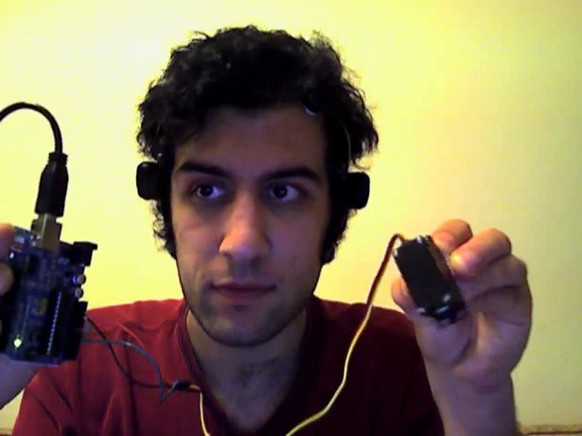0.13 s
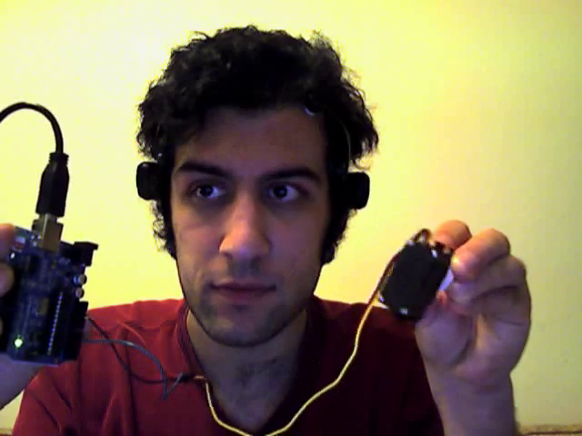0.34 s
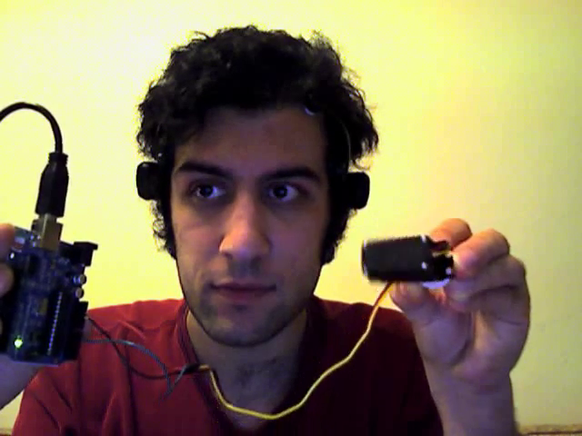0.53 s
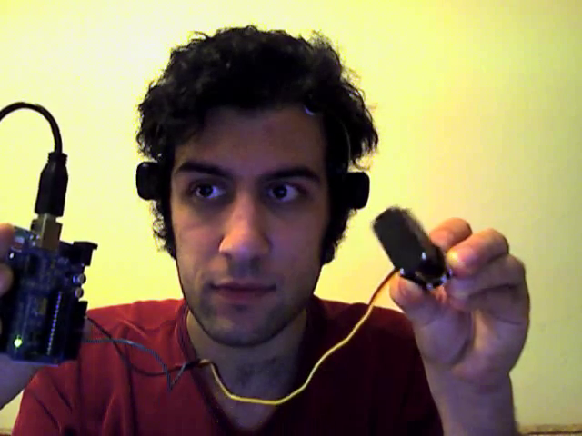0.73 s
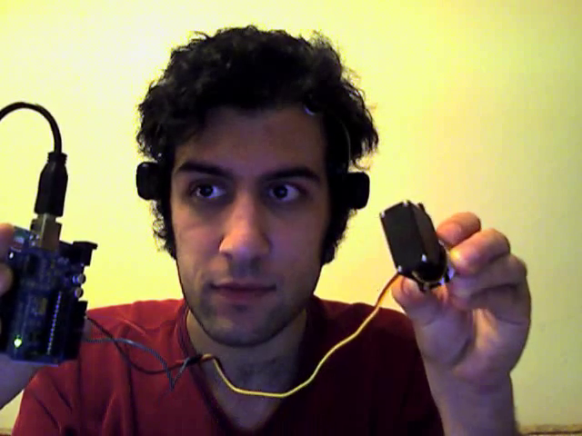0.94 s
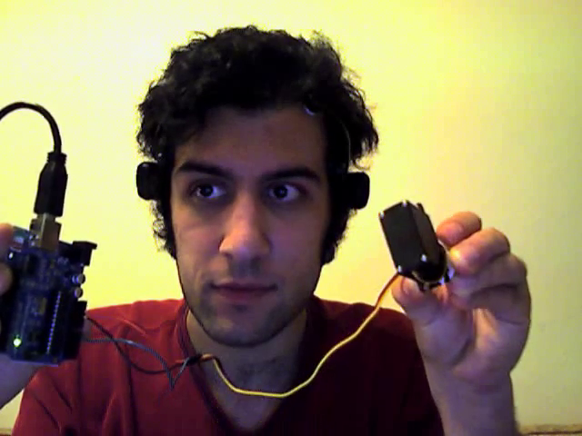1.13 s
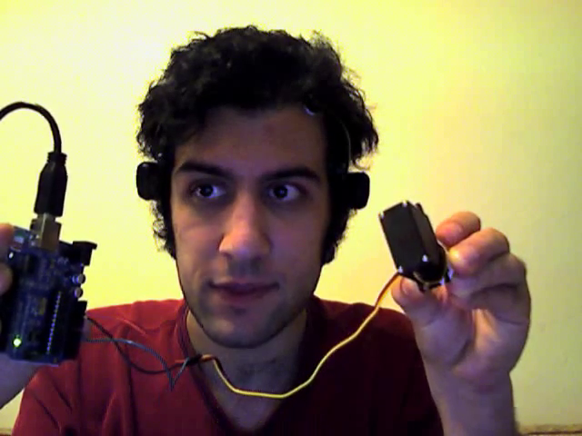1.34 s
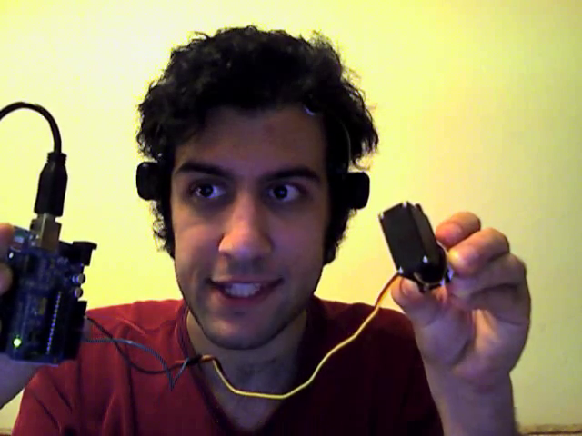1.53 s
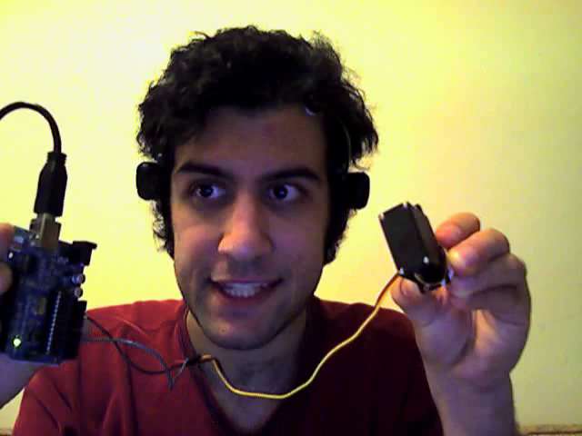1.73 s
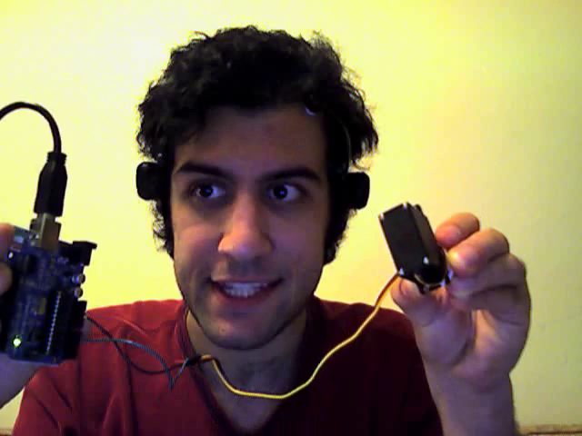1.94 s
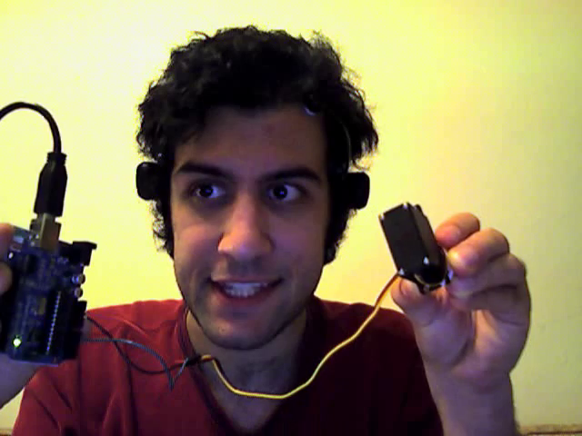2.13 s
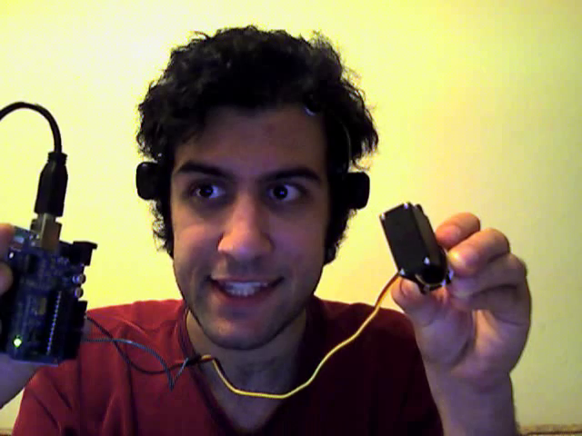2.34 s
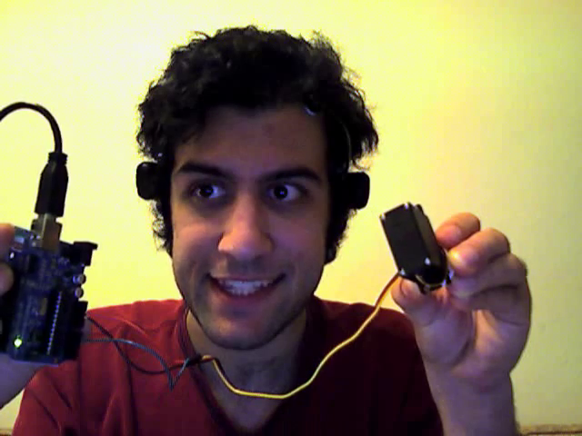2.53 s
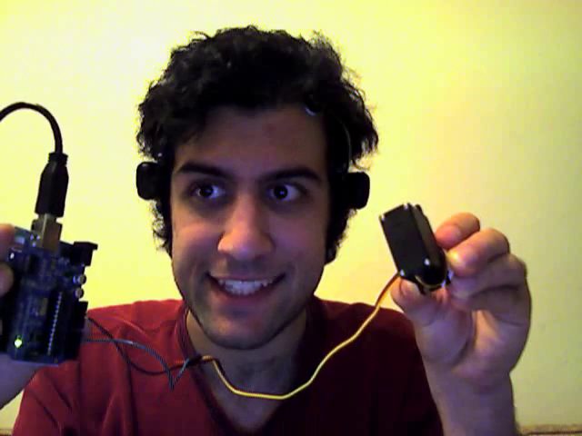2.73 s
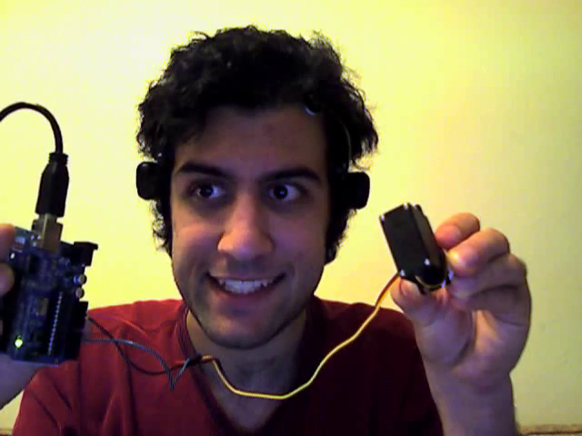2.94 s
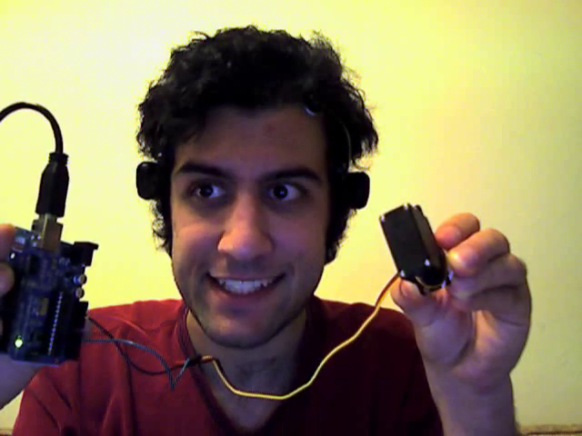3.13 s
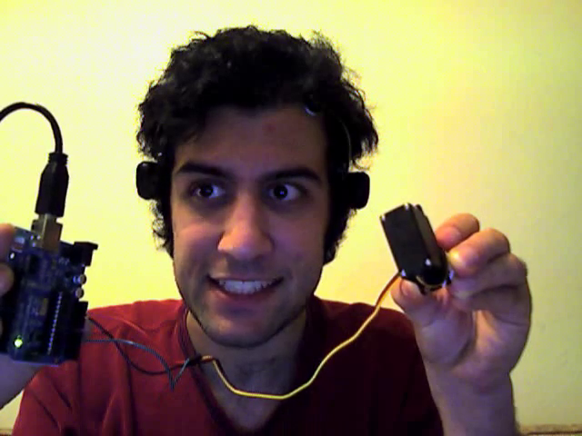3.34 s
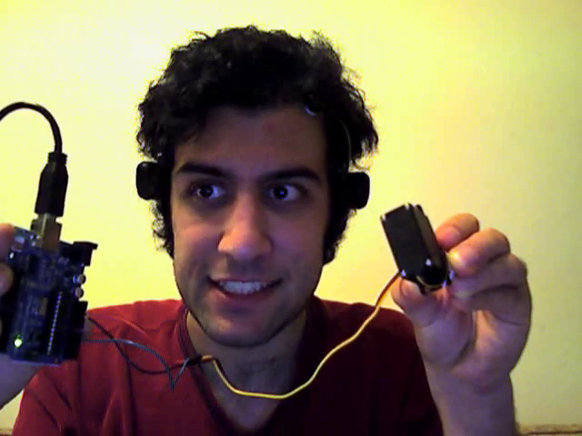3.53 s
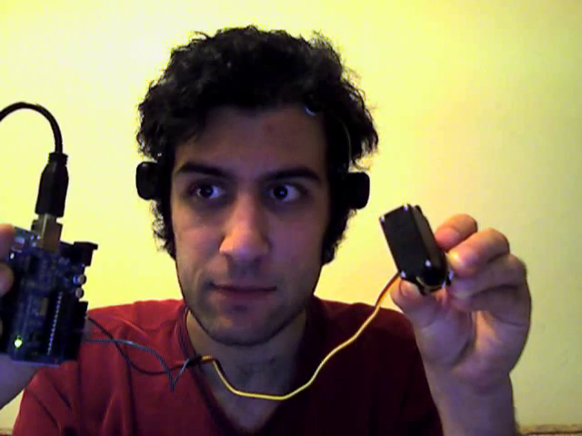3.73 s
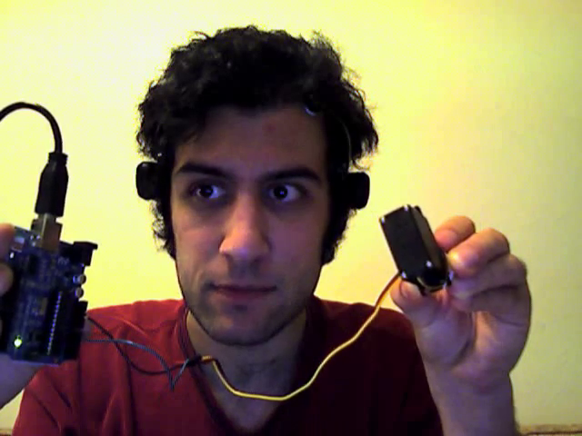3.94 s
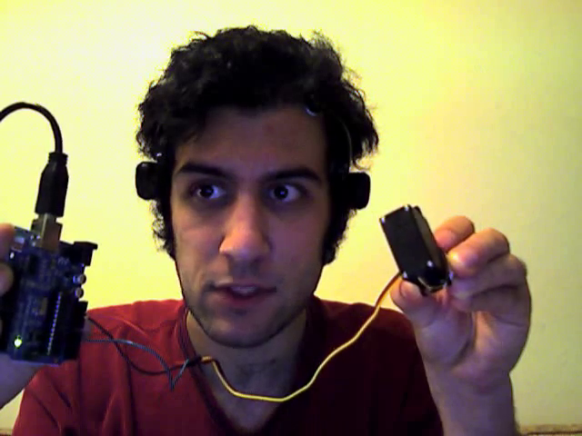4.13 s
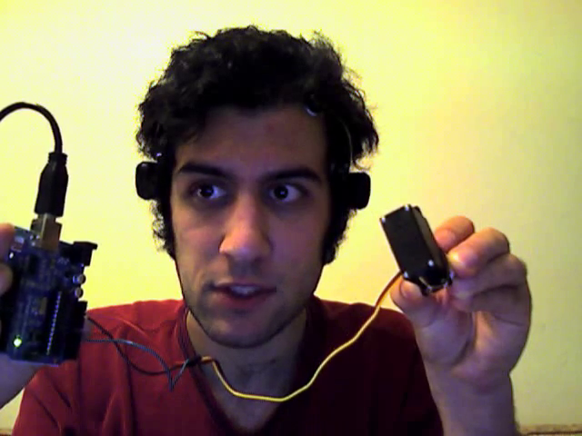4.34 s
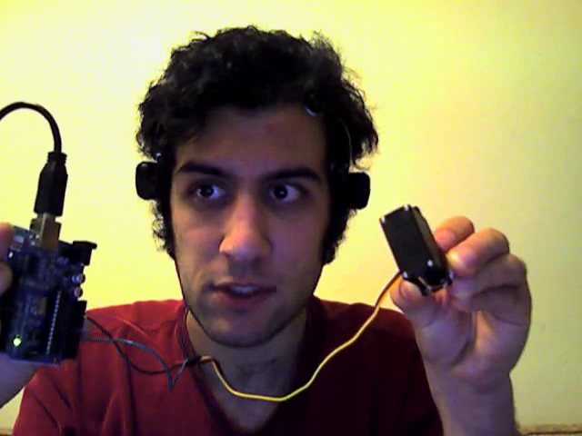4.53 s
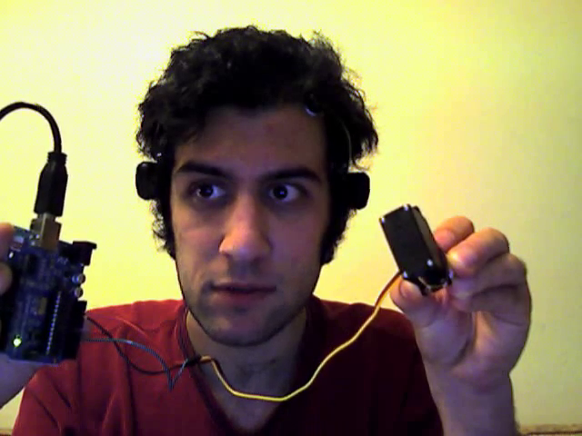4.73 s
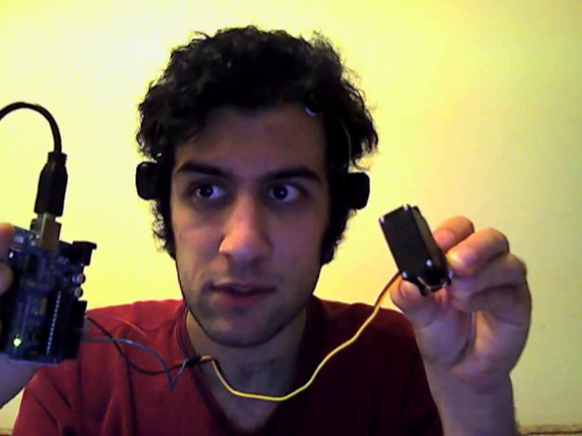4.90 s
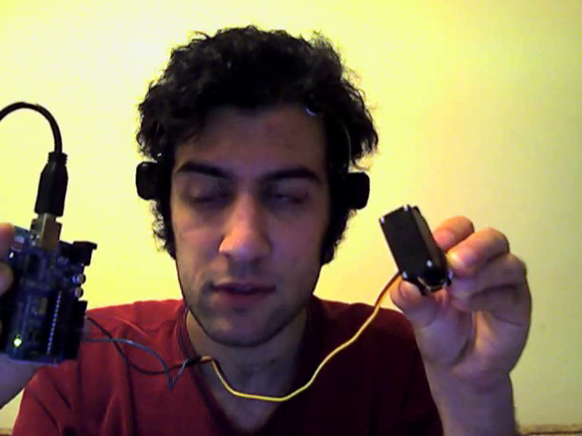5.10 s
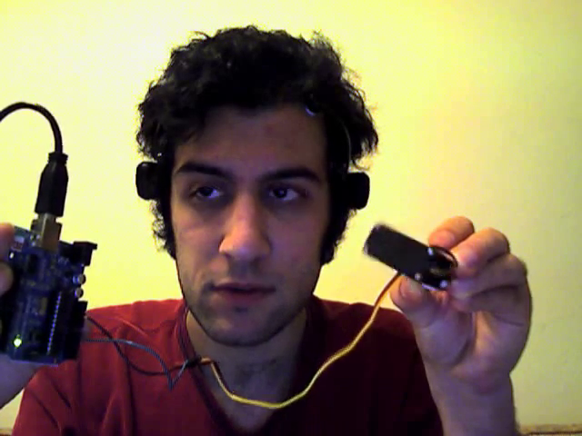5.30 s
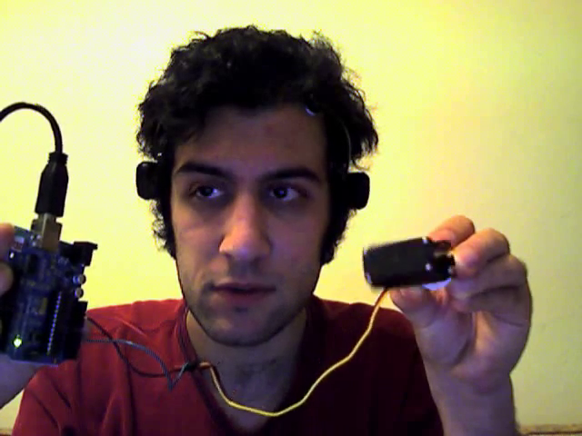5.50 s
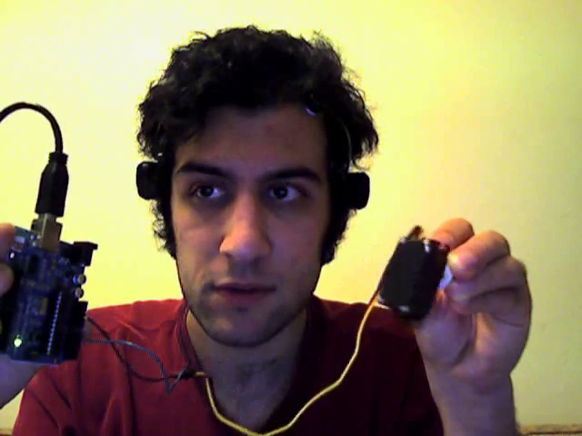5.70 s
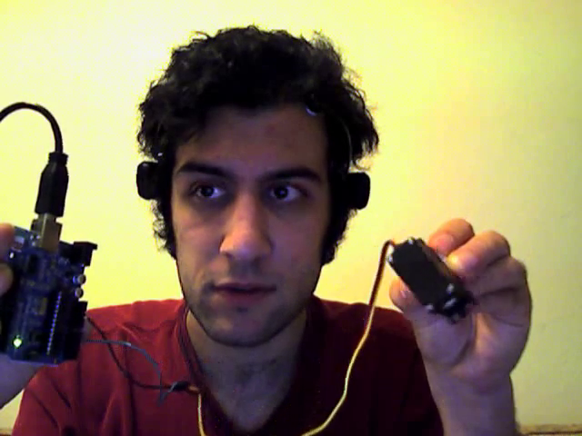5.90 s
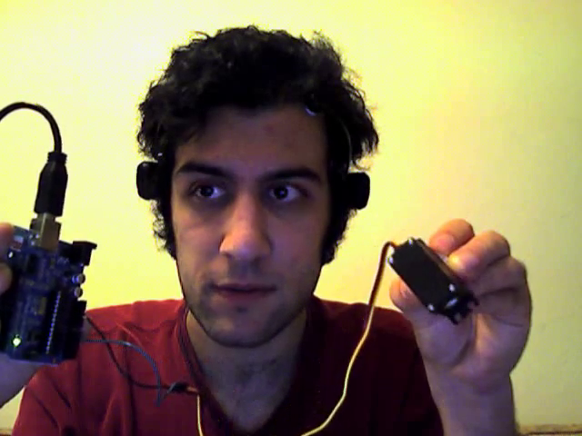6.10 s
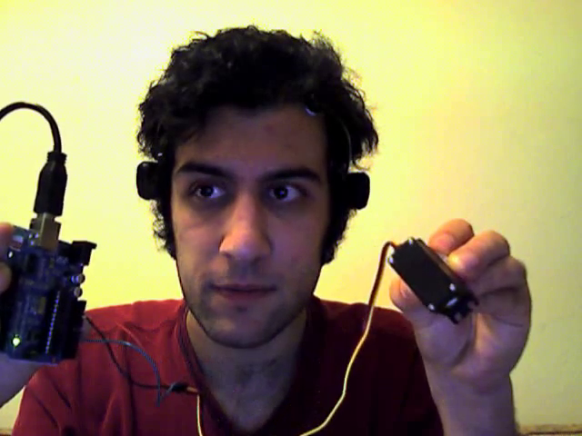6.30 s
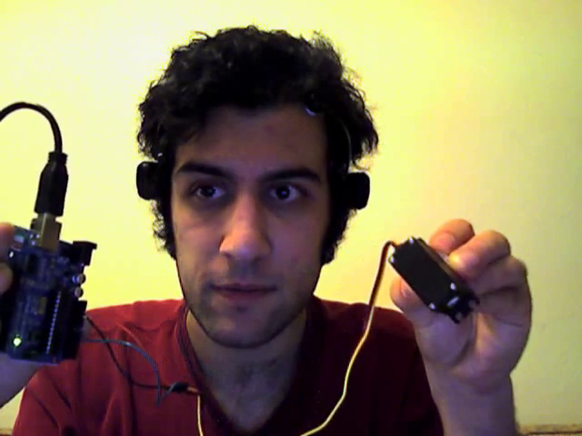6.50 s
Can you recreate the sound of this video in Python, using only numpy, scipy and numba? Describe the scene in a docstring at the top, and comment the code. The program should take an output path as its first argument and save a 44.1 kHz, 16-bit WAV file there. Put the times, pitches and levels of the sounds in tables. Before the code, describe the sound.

A quiet small room with soft hiss, faint low hum and unevenly swelling rumble. At 0.2 s a tiny geared motor close to the microphone starts abruptly with light clicks and whirs: a bright, gritty, buzzing chatter, strongest around 4 to 7 kHz, with thin whining tones that shift as the plastic case turns. At about 0.94 s it brakes with a tight cluster of hard knocks and is silent by 1.0 s, leaving a short damped echo. A crisp tick cluster falls at 1.65 s, a very faint one at 2.4 s, small clicks at 3.8 and 4.2 s, and a faint one at 5.0 s, among barely audible rustles. At 5.35 s the motor whirs again, similarly rough and reedy, with slight knocks near 5.6 s. It stops around 6.05 to 6.12 s with louder clacks and a brief rattle, then the hushed room remains until about 6.7 s.

```python
"""Small geared servo swinging

A small geared servo, held by its arm, swings its plastic case one way and later back, close to the microphone.
Random tooth impacts ring moving case resonances, noise bands make the tooth whine, narrow wall modes sing.
Chirped slack knocks come mostly at start and stop; short ringing ticks fall between the swings.
Underneath: a damped room of decaying noise, banded hiss and rumble, wavering hum and soft noise rustles."""
import sys
import numpy as np
from scipy import signal
from scipy.io import wavfile
from scipy.ndimage import uniform_filter1d
from numba import njit

SR = 44100
rng = np.random.default_rng(int(sys.argv[2]) if len(sys.argv) > 2 else 0)


def materialize(psi):
    """Save the field psi as 16-bit PCM at rate SR to the path in sys.argv[1].

    A 1-D psi becomes a single channel; in a 2-D psi each row is a channel.
    """
    bounded = np.clip(np.atleast_2d(psi).T, -1, 1)
    quanta = np.round(bounded * 32767).astype(np.int16)
    wavfile.write(sys.argv[1], SR, quanta)


N = 293558


def undb(db):
    """dB to gain."""
    return 10 ** (np.asarray(db) / 20)


def unit(x):
    """Scale to rms 1."""
    return x / np.sqrt(np.mean(x ** 2))


def tone(hz):
    """A sine that follows a moving pitch."""
    return np.sin(2 * np.pi * np.cumsum(hz) / SR)


def decay(t, t60_s):
    """Exponential fall of 60 dB in t60_s."""
    return np.exp(-np.log(1000) * t / t60_s)


def walk(rate_hz, size=N):
    """Random levels held for 1 / rate_hz and smoothed twice; spread near 1."""
    hold = int(SR / rate_hz)
    steps = np.repeat(rng.standard_normal(size // hold + 1), hold)
    return 1.3 * uniform_filter1d(uniform_filter1d(steps, hold), hold)[:size]


def ring(x, hz, width_hz):
    """One fixed resonance."""
    return signal.lfilter(*signal.iirpeak(min(hz, .45 * SR), hz / width_hz, fs=SR), x)


def noise_band(size, hz, width_hz):
    """Noise through the same resonance twice, rms 1."""
    return unit(ring(ring(rng.standard_normal(size), hz, width_hz), hz, width_hz))


@njit
def glide(x, hz, width_hz):
    """A steep resonance (two state-variable bandpasses in a row) whose centre moves."""
    y = x.copy()
    for _ in range(2):
        band, low = 0., 0.  # integrator states
        for i in range(len(x)):
            g, damping = np.tan(np.pi * hz[i] / SR), width_hz / hz[i]
            v = (band + g * (y[i] - low)) / (1 + g * (g + damping))
            band, low, y[i] = 2 * v - band, low + 2 * g * v, damping * v
    return y


def waver(hz, width_hz):
    """A thin band of noise about a moving pitch, rms 1."""
    pole = np.exp(-np.pi * width_hz / SR)
    slow = signal.lfilter([1], [1, -pole], rng.standard_normal((2, len(hz))))
    carrier = np.exp(2j * np.pi * np.cumsum(hz) / SR)
    return unit(((slow[0] + 1j * slow[1]) * carrier).real)


# breakpoints of the low rumble: t/s, level/dB (heard as swells about the mean below)
RUMBLE = [(0.0, -45), (0.09, -59), (0.65, -59.5), (0.78, -46), (1.11, -63.5), (1.18, -49), (1.3, -66),
          (1.39, -57), (2.35, -60.5), (2.39, -49), (2.65, -61.5), (2.89, -52), (2.95, -63), (3.15, -51),
          (3.21, -57), (3.63, -62), (3.67, -46.5), (3.74, -58), (4.51, -55.5), (4.56, -48), (4.65, -66),
          (4.99, -49.5), (5.04, -58), (6.17, -56.5), (6.34, -59.5), (6.66, -61)]
RUMBLE_MEAN_DB, RUMBLE_FLUTTER_DB = -58.5, 1.5


def rumble_swell(t):
    """Rumble swells in dB about the mean, with a random flutter several times a second."""
    return np.interp(t, *np.transpose(RUMBLE)) - RUMBLE_MEAN_DB + RUMBLE_FLUTTER_DB * walk(9)


# spectrum of the hiss and bass, relative: f/Hz, density/dB per Hz
HISS_SPECTRUM = [(15, -29), (25, -2), (50, -4.5), (91, -10), (150, -12.5), (300, -15.5), (450, -15),
                 (900, -16.5), (1330, -21), (1900, -20), (2500, -22.5), (3570, -30.5), (4300, -20),
                 (5200, -27.5), (8560, -36.5), (13000, -49.5), (15000, -72.5)]
HISS_DB, RUMBLE_EDGE_HZ = -54.5, 198  # overall rms; above the edge the swells fade out


def hiss(swell_db):
    """Quarter-octave noise bands in drifting patches; the bass follows the rumble swells."""
    out, (hz_at, db_at) = 0, np.transpose(HISS_SPECTRUM)
    for hz in 25 * 2 ** np.arange(0, 9.3, 1 / 4):
        band_db = np.interp(np.log(hz), np.log(hz_at), db_at) + 10 * np.log10(hz)  # wider bands hold more
        bass_db = swell_db / (1 + (hz / RUMBLE_EDGE_HZ) ** 2)
        patch_db = 3 * walk(11) / (1 + hz / 6000)  # steadier toward the treble
        out = out + noise_band(N, hz, hz / 4) * undb(band_db + bass_db + patch_db)
    return unit(out) * undb(HISS_DB)


# hum tones, before swell and waver: f/Hz, rms level/dB
HUM = [(120, -66), (278, -74.5)]


def hum(swell_db):
    """Low sines that waver in pitch and level and swell along with the rumble."""
    out = 0
    for hz, db in HUM:
        level_db = db + 1.01 * swell_db + 0.525 * walk(2.2)
        out = out + np.sqrt(2) * undb(level_db) * tone(hz + 2.48 * walk(9.5))
    return out


# brief soft rustles: t/s, level/dB, f/Hz, width/Hz, length/s
RUSTLES = [(1.27, -57, 584, 600, 0.032), (1.713, -57, 507, 500, 0.022), (2.171, -65.5, 2490, 248, 0.021),
           (3.122, -62.5, 580, 596, 0.063), (3.542, -55, 780, 814, 0.028), (3.901, -60.5, 580, 596, 0.067),
           (3.969, -61.5, 1720, 250, 0.028), (4.21, -62, 5040, 900, 0.04), (4.266, -63, 2010, 350, 0.044),
           (5.325, -64, 2480, 120, 0.04)]


def rustles(t):
    """Short puffs of wide or narrow noise under bell-shaped swells."""
    out = np.zeros(N)
    for at, db, hz, width_hz, length in RUSTLES:
        near = slice(int(at * SR) - SR // 4, int(at * SR) + SR // 4)
        puff = np.exp(-((t[near] - at) / length) ** 2)
        out[near] += undb(db) * noise_band(SR // 2, hz, width_hz) * puff
    return out


ROOM_T60_S, ROOM_DB, ROOM_GAP_S, ROOM_TOP_HZ = 0.33, -11, 0.012, 12000
EARLY_T60_S, EARLY_DB = 0.098, 5  # the first echoes stand above the tail and die quickly


def room(x):
    """Diffuse echo of decaying noise: weak from nearby things, fuller when the walls answer, dull on top."""
    t = np.arange(SR // 2) / SR
    fall = decay(t, ROOM_T60_S) + undb(EARLY_DB) * decay(t, EARLY_T60_S)
    arrival = np.where(t < ROOM_GAP_S, .5, 1) * (t > .001)
    tail = rng.standard_normal(len(t)) * fall * arrival
    tail = signal.lfilter(*signal.butter(1, ROOM_TOP_HZ, fs=SR), tail)
    return undb(ROOM_DB) * signal.fftconvolve(x, tail / np.linalg.norm(tail))[:N]


# dry ticks: t/s, level/dB (before tilt and mode levels), tilt/dB per octave, thud level/dB,
# level toward the walls/dB (relative to direct)
TICKS = [(1.647, -25, 17.5, -72, -4), (1.6483, -30, 8, -70, -3), (1.6488, -17, -3, -68, -5.5),
         (1.6498, -21.5, 1.5, -70, -1.5), (2.375, -52, 18, -85, -2), (3.8113, -38, -6, -60, 2),
         (3.8121, -29.5, -1, -39.5, -1), (4.1751, -43.5, 0, -48, 8), (4.184, -50, 0, -79, -1),
         (4.2, -55, 0, -80, 3), (4.218, -48, -8, -77, 3), (4.229, -60, 0, -80, 3),
         (4.245, -50, -13, -79, 0), (4.9938, -44.5, -24, -84, 4), (4.9942, -56, -10, -76, 7)]
# short modes shared by all ticks: f/Hz, level/dB, t60/s
TICK_MODES = [(2800, -19, .004), (3950, -7, .004), (5100, 0, .0042), (6300, -5, .0032), (7550, -9, .003),
              (8800, -16, .0025), (10300, -27, .002), (13500, -43, .001)]
TICK_PIVOT_HZ, THUD_HZ, THUD_S = 5500, 1370, 0.00074
TICK_CONTACT_S = 0.0004  # the blow builds up over this time


def ticks(t):
    """Each tick rings the same short modes, brighter or duller, over a soft thud. Rows: direct, toward the walls."""
    out = np.zeros((2, N))
    for at, db, tilt_db, thud_db, walls_db in TICKS:
        near = slice(int(at * SR) + 1, int(at * SR) + SR // 20)
        age = t[near] - at
        thud_shape = age / THUD_S * np.exp(1 - age / THUD_S)
        tick = undb(thud_db) * np.sin(2 * np.pi * THUD_HZ * age) * thud_shape
        for hz, mode_db, t60_s in TICK_MODES:
            level_db = db + mode_db + tilt_db * np.log2(hz / TICK_PIVOT_HZ)
            shape = (1 - np.exp(-age / TICK_CONTACT_S)) ** 3 * decay(age, t60_s)
            tick += undb(level_db) * np.sin(2 * np.pi * hz * age) * shape / shape.max()
        out[:, near] += np.outer([1, undb(walls_db)], tick)
    return out


# gear slack taken up: t/s, peak level/dB, f/Hz (at the peak), length/s
KNOCKS = [(.209, -25, 6000, .001), (0.217, -20.5, 6200, 0.0019), (0.222, -17.5, 6510, 0.0022),
          (0.933, -16, 5800, 0.0016), (.938, -12.5, 6700, 0.002), (0.9394, -11, 4880, 0.0022),
          (0.9445, -14.5, 4970, 0.0016), (0.953, -29, 5000, 0.00073), (5.355, -22, 5140, 0.0041),
          (5.361, -34, 2800, 0.0016), (5.362, -20, 5000, 0.0027), (5.597, -28, 6550, 0.003),
          (5.604, -26, 6500, 0.003), (6.043, -19, 6500, .003), (6.046, -13, 6170, .0013),
          (6.0485, -7.5, 5700, .0024), (6.053, -12.5, 6100, 0.00092), (6.056, -18.5, 6350, 0.0015),
          (6.0586, -15, 6200, .001), (6.0608, -19, 5900, .001), (6.064, -25, 6340, .0015),
          (6.0886, -17, 6450, .0009), (6.0904, -17, 6450, .0009), (6.0923, -17.5, 6250, 0.0009)]
KNOCK_FALL_HZ_PER_S = 104000  # each knock's ring falls quickly in pitch, which broadens it
KNOCK_RISE_SHARE = 0.68  # rise time as a share of the length
RATTLE_DB, RATTLE_PER_DB = 14.5, 0.67  # the chatter flares with each knock, more with a hard one


def knocks(t):
    """Slack knocks as falling chirps under short blows; returns the chatter's flare gain and the rings."""
    rattle, rings = np.ones(len(t)), np.zeros(len(t))
    for at, db, hz, length in KNOCKS:
        age = t - at
        blow = np.exp(-np.maximum(-age / KNOCK_RISE_SHARE, age) ** 2 / length ** 2)
        cycles = (hz - KNOCK_FALL_HZ_PER_S / 2 * age) * age
        rattle += undb(RATTLE_DB + RATTLE_PER_DB * db) * blow
        rings += undb(db) * blow * np.sin(2 * np.pi * cycles)
    return rattle, rings


# swings: motor on t/s, braking t/s, at rest t/s, from/degrees, to/degrees, tooth rate f/Hz,
# body level/dB, edge level/dB, top level/dB
SWINGS = [(0.2075, 0.936, 0.995, 0.55, 185, 2021, 4, 2, -1),
          (5.348, 6.053, 6.125, 169, 8.2, 2106, 1.5, -3.5, 2.5)]
START_SAG, RUN_UP_S = .055, .13  # wall modes start flat by this share and rise as the motor gains speed


def motion(t):
    """How the servo moves: gates for running and driven, case angle, tooth rate, face levels and start sag."""
    running, driven, angle, tooth_hz, face_db, sag = 0, 0, 0, 0, 0, 0
    for on, brake, rest, start_deg, end_deg, hz, *db in SWINGS:
        now = (t > on) & (t < rest)
        running = running + np.clip((t - on) / 0.0052, 0, 1) * np.clip((rest - t) / 0.0096, 0, 1)
        driven = driven + now * np.clip((brake - t) / 0.0048, 0, 1)
        angle = angle + now * np.interp(t, [on, brake], [start_deg, end_deg])
        tooth_hz = tooth_hz + now * hz
        face_db = face_db + np.outer(db, now)
        sag = sag + now * START_SAG * np.exp(-np.abs(t - on) / RUN_UP_S)
    return running, driven, angle, tooth_hz, face_db, sag


# shafts that make the chatter throb: f/Hz, depth/0-1
SHAFTS = [(64, .2), (35, .18), (200, .08)]


def chatter(n, hits_hz=9000):
    """Dense uneven tooth impacts that throb with the shafts, rms 1."""
    hits = (rng.random(n) < hits_hz / SR) * rng.standard_normal(n)
    for hz, depth in SHAFTS:
        hits = hits * (1 + depth * tone(hz * (1 + 0.05 * walk(8.5, n))))
    return unit(hits)


MODE_WANDER, MODE_DRIFT_DB = .007, 1.5  # pitch wander as a share; level drift


def face(hits, modes, rattle, centre_hz):
    """The modes of one face, rms near 1 between knocks; each swells, fades and wanders in pitch at random."""
    out, n = 0, len(hits)
    for k, (hz, width_hz, db) in enumerate(modes):
        level = undb(db + MODE_DRIFT_DB * walk(30, n)) / np.sqrt(width_hz)
        mode_hz = (centre_hz + hz) * (1 + MODE_WANDER * walk(20, n))
        # two stages in a row narrow the peak, so each is widened
        out = out + (-1) ** k * level * glide(hits, mode_hz, 1.33 * width_hz)
    return unit(out) * np.sqrt(np.mean(rattle ** 2))


# case modes by face: f/Hz, width/Hz, level/dB (relative within a face)
BODY = [(2930, 500, 5), (3450, 500, 4), (4100, 450, 17), (4500, 450, 17)]
EDGE = [(7210, 450, 4.5), (8430, 760, -7), (9160, 370, -6.5), (9880, 1100, -6.5)]
TOP = [(11300, 2200, 8), (12900, 1200, 0), (14070, 900, -1.5)]
# the two rings of modes: f/Hz from the sliding centre, width/Hz, level/dB
LOWER_RING = [(-400, 430, -5.5), (-80.5, 510, -2.5), (251.5, 480, -0.5), (579.5, 480, -5.5)]
UPPER_RING = [(-350, 490, -1.4), (-2, 350, -1.6), (230.5, 290, -1.5)]
# ring centres sliding as the case turns, one list a swing: t/s, lower f/Hz, upper f/Hz
RING_CENTRES = [
    [(.23, 5170, 6540), (.45, 5350, 6490), (.66, 5090, 6540), (.82, 4976, 6166), (.93, 5063, 6150)],
    [(5.38, 5080, 6235), (5.5, 5320, 6470), (5.6, 5380, 6550), (5.75, 5350, 6494), (5.86, 5410, 6330),
     (6.04, 5460, 6365)],
]
# case angles at which the face levels are given: angle/degrees
ANGLES_DEG = [0, 30, 60, 90, 120, 150, 180]
# face levels above the lower ring, one at each angle, before the swing's own trim: level/dB
UPPER_DB = [-2.5, 1, 2, 4, 0.5, -1, 1.5]
BODY_DB = [-13.5, -19.5, -16.5, -19.5, -14.5, -16.5, -14]
EDGE_DB = [-11.5, -14.5, -14, -13.5, -11, -8, -17.5]
TOP_DB = [-37, -31, -31.5, -25, -26.5, -23, -39]


def case(t, hits, rattle, angle, face_db):
    """Tooth impacts ring every face of the plastic case; the balance shifts as the case turns."""
    def facing(db):
        return np.interp(angle, ANGLES_DEG, db)

    at, lower_at, upper_at = np.vstack(RING_CENTRES).T
    body_db, edge_db, top_db = face_db
    faces = ((LOWER_RING, 0, np.interp(t, at, lower_at)),
             (UPPER_RING, facing(UPPER_DB), np.interp(t, at, upper_at)),
             (BODY, facing(BODY_DB) + body_db, 0),
             (EDGE, facing(EDGE_DB) + edge_db, 0),
             (TOP, facing(TOP_DB) + top_db, 0))
    return sum(undb(db) * face(hits, modes, rattle, centre_hz) for modes, db, centre_hz in faces)


# tooth tone overtones at 2, 3, 4 times the tooth rate: level/dB (added to the overtone level)
OVERTONES_DB = [-9, -0.5, -15]
TOOTH_FLICKER_DB, TOOTH_WOBBLE, TOOTH_BLUR_HZ = 2.5, .012, 40  # wobble is a share of the pitch


def tooth_whine(tooth_hz, tone_db, overtone_db):
    """Tooth rate and overtones as thin noise bands; the fundamental flickers, all wobble in pitch together."""
    n = len(tooth_hz)
    tooth_hz = tooth_hz * (1 + TOOTH_WOBBLE * walk(20, n))
    levels_db = [tone_db + TOOTH_FLICKER_DB * walk(40, n)] + [overtone_db + db for db in OVERTONES_DB]
    out = 0
    for multiple, db in enumerate(levels_db, start=1):
        out = out + undb(db) * waver(multiple * tooth_hz, TOOTH_BLUR_HZ * multiple ** 1.25)
    return out


STEADY_BELOW_HZ = 115  # the narrower a mode is than this, the more it holds a steady tone


def sing(hits, hz, width_hz):
    """A narrow mode rung by the teeth, part rough and part steady tone, rms near 1."""
    steady = np.clip(1 - width_hz / STEADY_BELOW_HZ, 0, 1)
    rough = unit(glide(hits, hz, width_hz))
    return np.sqrt(1 - steady) * rough + np.sqrt(2 * steady) * tone(hz)


# narrow wall modes that sing while they face the microphone: f/Hz (before sag and wander), width/Hz,
# facing/degrees, beam half-width/degrees, level out/dB, level back/dB (both before flicker)
WALL_MODES = [(2460, 190, 120, 20, -59.5, -68), (2750, 300, 18, 23, -66, -73),
              (2770, 300, 149, 36.7, -74, -68), (2956, 210, 173, 17, -50.5, -57),
              (3214, 160, 62, 11, -55, -69.5), (3520, 160, 25, 19, -61, -56),
              (3824, 150, 65, 14, -49.5, -66), (4050, 126, 167, 20, -45.5, -62),
              (4350, 120, 108, 14, -50.5, -66), (4240, 120, 38, 21, -62, -53), (4865, 45, 56, 57, -44, -50),
              (4945, 46, 142, 52, -35.5, -60.5), (5060, 46, 140, 34, -60.5, -44),
              (5260, 65, 45, 48, -40, -38), (5688, 120, 44, 30, -43.5, -41.5),
              (6100, 90, 160, 34, -41.5, -46), (6450, 90, 55, 44, -43, -37),
              (6710, 90, 86, 60, -41.5, -36.5), (7470, 120, 160, 39, -46, -50),
              (7600, 160, 60, 15, -41, -51), (8100, 140, 54, 16, -51, -55),
              (8410, 140, 158, 39, -55, -54.5), (9370, 140, 59, 36, -60, -64),
              (10030, 140, 139, 21, -54.5, -64)]
WALL_WANDER, WALL_FLICKER_DB = .003, 2  # wander is a share of the pitch
COAST_DB = -11.5  # the wall modes fall back once the motor brakes


def singing_walls(t, teeth, angle, driven, sag):
    """Wall modes rung by the teeth, each swelling as it turns through its beam toward the microphone."""
    out, n = 0, len(t)
    coast = driven + (1 - driven) * undb(COAST_DB)
    for hz, width_hz, toward_deg, beam_deg, out_db, back_db in WALL_MODES:
        swell = np.sqrt((1 - ((angle - toward_deg) / beam_deg) ** 2).clip(0))
        level = undb(np.where(t < SWINGS[1][0], out_db, back_db) + WALL_FLICKER_DB * walk(70.1, n))
        mode_hz = hz * (1 - sag + WALL_WANDER * walk(25, n))
        out = out + level * swell * coast * sing(teeth, mode_hz, width_hz)
    return out


# drive levels through the swings: t/s, chatter level/dB, tooth tone level/dB, overtone level/dB
DRIVE = [(.245, -37, -100, -53), (.4, -35, -59, -41), (.45, -31.5, -70, -39), (.5, -34, -60, -46),
         (.56, -33.5, -51, -47), (.61, -32.5, -64, -47.5), (.66, -33, -61, -54), (.72, -35.5, -70.5, -49),
         (.79, -37.5, -64, -38), (.87, -32, -75, -44.5), (.95, -32, -79, -39), (.975, -42, -76, -41),
         (.995, -34, -76, -41), (5.385, -34.5, -91, -43), (5.45, -38, -90, -56), (5.58, -36, -79, -53.5),
         (5.66, -37, -89, -46.5), (5.8, -30.5, -83, -51), (5.9, -34, -60, -43.5), (5.95, -31.5, -70.5, -42),
         (6.01, -31.5, -50, -40), (6.068, -35.5, -68.5, -29), (6.083, -40.5, -68, -35),
         (6.097, -35, -68, -36), (6.12, -45, -57, -36.5)]
KNOCK_WALLS_DB = -5  # share of a knock's ring that reaches the walls


def servo(t):
    """Gear chatter in the case, knocks, tooth whine and singing walls. Rows: direct, toward the walls."""
    at, *columns = np.transpose(DRIVE)
    chatter_db, tone_db, overtone_db = (np.interp(t, at, column) for column in columns)
    running, driven, angle, tooth_hz, face_db, sag = motion(t)
    rattle, rings = knocks(t)
    teeth = chatter(len(t))
    body = undb(chatter_db) * case(t, teeth * rattle, rattle, angle, face_db)
    whine = driven * tooth_whine(tooth_hz, tone_db, overtone_db)
    walls = singing_walls(t, teeth, angle, driven, sag)
    return running * (body + whine + walls) + np.outer([1, undb(KNOCK_WALLS_DB)], rings)


def scene():
    """Servo and ticks, direct and through the room, over hiss, hum and rustles."""
    t = np.arange(N) / SR
    swell_db = rumble_swell(t)
    background = hiss(swell_db) + hum(swell_db) + rustles(t)
    dry_ticks, wall_ticks = ticks(t)
    # the servo is computed only around its swings
    moving = sum((t > on - .02) & (t < rest + .02) for on, _, rest, *_ in SWINGS) > 0
    motor = np.zeros((2, N))
    motor[:, moving] = servo(t[moving])
    echo = room(motor[1] + wall_ticks)
    return (background + echo + dry_ticks + motor[0])[None]


TOP_HZ = 15700


def record(dry):
    """A steep elliptic low-pass cuts the top."""
    return signal.sosfilt(signal.ellip(10, .2, 70, TOP_HZ, fs=SR, output="sos"), dry)


dry = scene()
out = record(dry)
materialize(out)
```